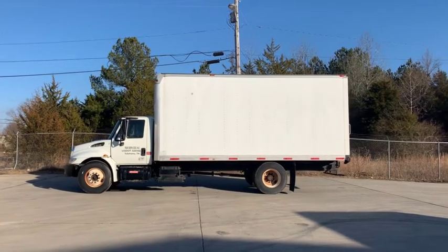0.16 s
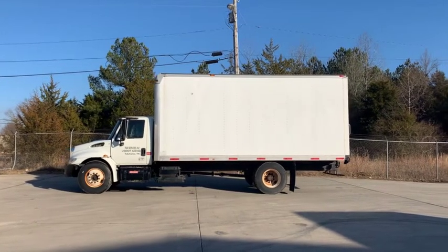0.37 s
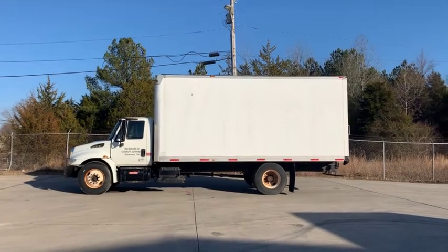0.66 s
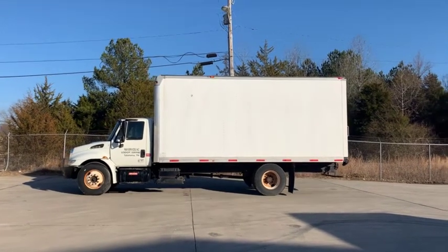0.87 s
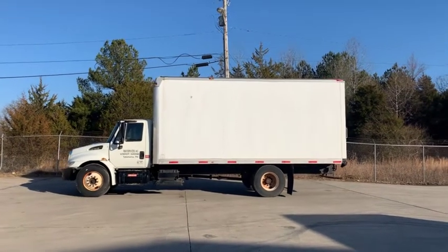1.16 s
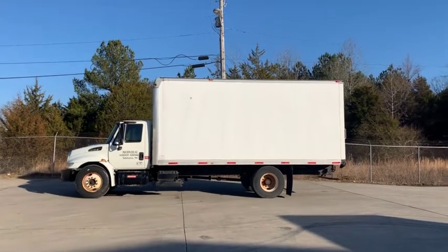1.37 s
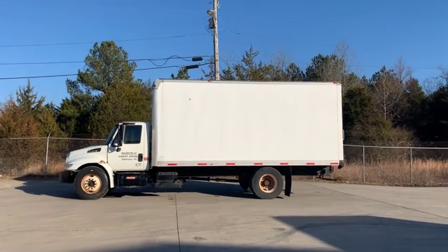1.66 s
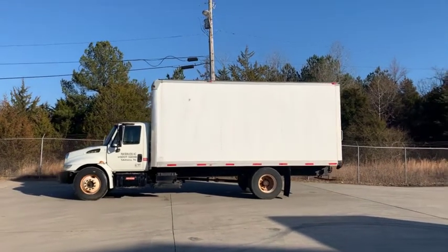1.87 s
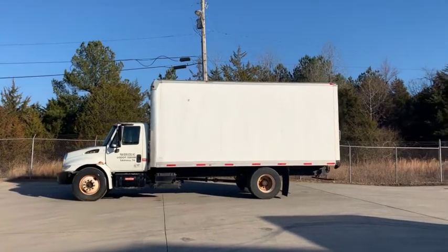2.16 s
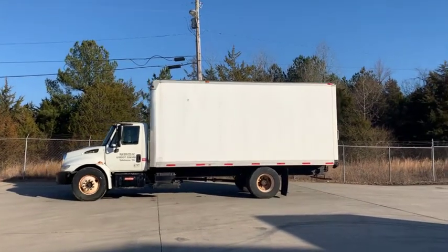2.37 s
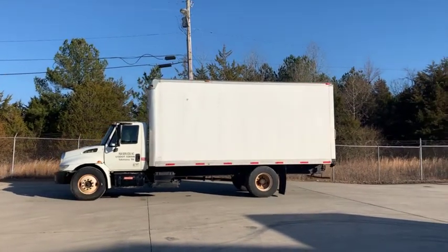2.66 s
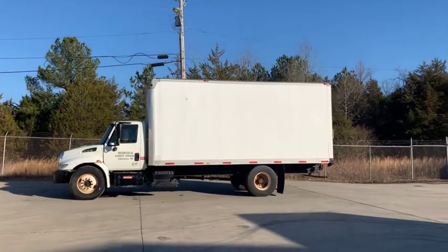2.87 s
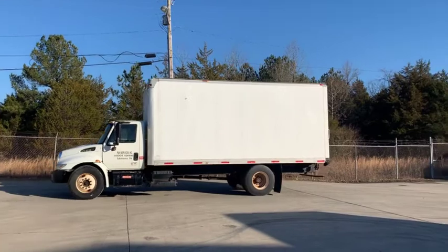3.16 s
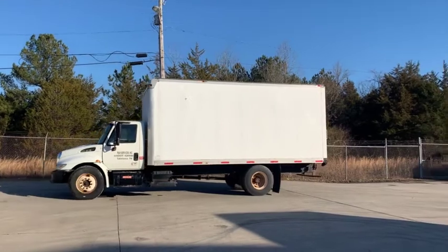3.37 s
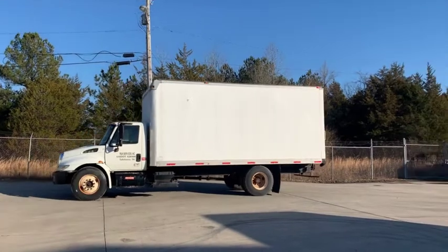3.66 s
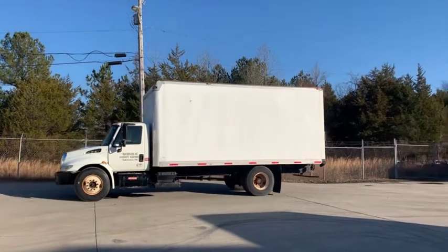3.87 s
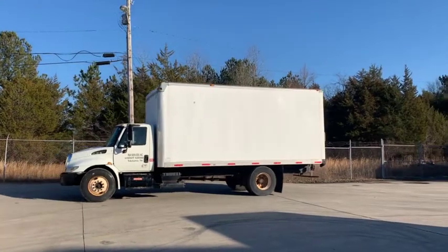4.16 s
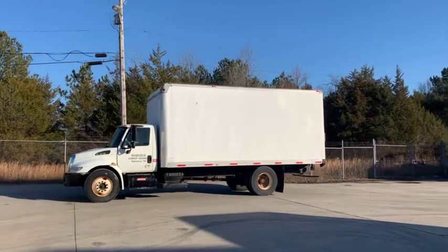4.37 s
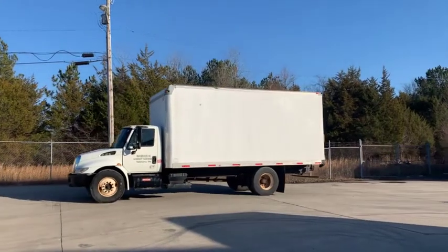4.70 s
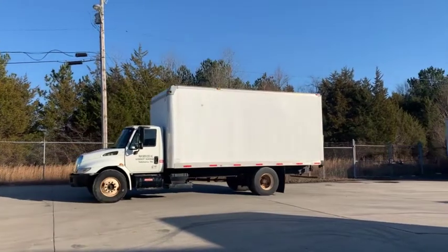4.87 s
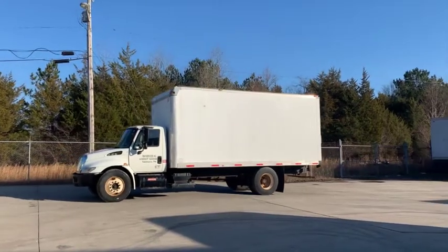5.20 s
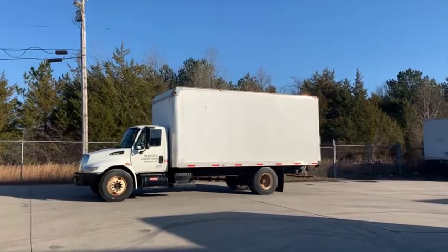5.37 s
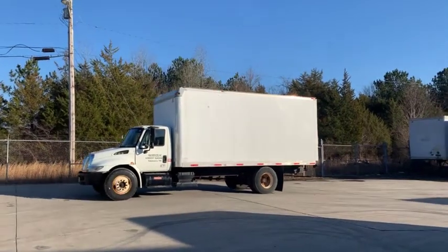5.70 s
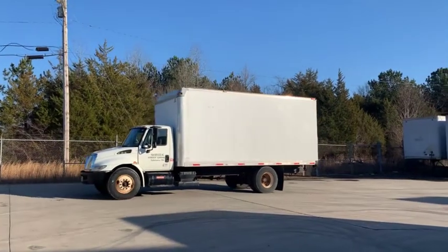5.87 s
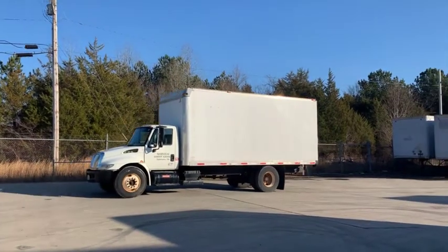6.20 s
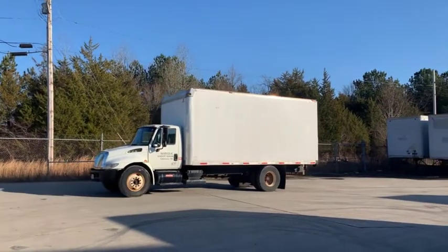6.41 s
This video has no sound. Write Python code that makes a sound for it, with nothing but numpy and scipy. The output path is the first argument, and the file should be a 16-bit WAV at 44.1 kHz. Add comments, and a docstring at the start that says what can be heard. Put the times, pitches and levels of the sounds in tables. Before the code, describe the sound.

A diesel box truck growls past in low gear across a concrete lot, drops suddenly to a quiet idle, then knocks with a hollow thud.

```python
"""Diesel box truck crossing a lot

A six-cylinder diesel box truck creeps across a concrete lot in low gear, passes, and drops back to idle. The
exhaust and the belt-driven fan sing in wavering tones; noise bursts at each firing shake the block. Injectors
tick as small struck modes, two faint steady hums sound throughout, and rubbing metal chirps. Near the end
something knocks in the chassis, and the box body answers with a ringing thud."""
import sys
import numpy as np
from scipy import signal
from scipy.fft import rfft, irfft, next_fast_len
from scipy.io import wavfile

SR = 44100
rng = np.random.default_rng(int(sys.argv[2]) if len(sys.argv) > 2 else 0)


def to_wav(s):
    """Save 16-bit WAV."""
    ch = np.atleast_2d(s).T  # columns
    pcm = np.round(np.clip(ch, -1, 1) * 32767)  # PCM
    wavfile.write(sys.argv[1], SR, pcm.astype(np.int16))


N = 288414
TIME = np.arange(N) / SR
SIZE = next_fast_len(N)
BIN_HZ = np.maximum(np.arange(SIZE // 2 + 1) * SR / SIZE, 1)

# exhaust: muffler and tailpipe resonances, levels relative to the overtones
BOOM_HZ, BOOM_WIDTH_HZ, BOOM_DB = 139.8, 20.7, 1
PIPE_HZ, PIPE_WIDTH_HZ, PIPE_DB = 372, 37, -10
# the boom throbs up and down by this much
THROBS_PER_FIRING, THROB_CREST_S, THROB_DB = .155, 1.155, 3

# fan: its octave blooms as it climbs into the shroud resonance
BLADES_PER_FIRING = 3.195
SHROUD_HZ, SHROUD_WIDTH_HZ, SHROUD_DB = 332, 22, 3
LINE_SLIP = .03   # phase unsteadiness of the boom and the fan tones, in cycles

# engine: speeds in firings per second, then the seconds it takes to cover its own distance from the listener
IDLE_HZ, CRUISE_HZ, PASS_S = 35, 50, 2.6
SWELL_IN_RUMBLE = 0.18   # share of each growl swell that reaches the rumble
LOPE_DB = 0.45   # clatter, crack and rasp pulse irregularly together
CRACK_DECAY = .42   # in firings
PUMP_DB, PUMP_CREST = 0.33, 0.69   # swing of the fuel stroke; its crest in firings into each pair

# injectors
TICK_HZ, TICK_SCATTER_HZ, TICK_SCATTER_DB = 4610, 130, 6
TICK_ALTERNATION_DB = 1   # one tick is harder by this much, the next softer

SQUEAK_SLIP = 0.25   # phase unsteadiness, in cycles
CUTOFF_HZ = 15100


def from_db(db):
    """Decibels to gain."""
    return 10 ** (np.asarray(db) / 20)


def rms_one(x):
    """Scale to rms 1 in the middle of the stereo image."""
    middle = np.atleast_2d(x).mean(0)
    return x / np.sqrt(np.mean(middle ** 2) + 1e-20)


def in_time(rows):
    """The columns of a curve at every sample."""
    s, *columns = np.transpose(rows)
    return [np.interp(TIME, s, c) for c in columns]


def at_hz(points, hz):
    """Read a table along log frequency."""
    known_hz, values = np.transpose(points)
    return np.interp(np.log(hz), np.log(known_hz), values)


def bumps(rows):
    """Smooth passing lifts or dips, in dB at every sample."""
    return sum(db * np.exp(-((TIME - s) / length) ** 2) for s, length, db in rows)


def drift(rate):
    """Smooth chance with about `rate` turns a second, spread 1."""
    slow = signal.resample_poly(rng.standard_normal(int(7 * rate) + 8), 16, 1)
    return rms_one(np.interp(TIME * rate * 16, np.arange(len(slow)), slow))


def tone(turns, waver_db, waver_rate, slip):
    """One partial whose strength and phase waver as the sound paths shift."""
    strength = from_db(waver_db * drift(waver_rate))
    phase = turns + rng.random() + slip * drift(waver_rate)
    return np.sqrt(2) * strength * np.sin(2 * np.pi * phase)


def resonance(hz, centre_hz, width_hz):
    """Gain of a tone that moves through a resonance; 1 on top."""
    return 1 / np.hypot(1, 2 * (hz - centre_hz) / width_hz)


def lifts(hz):
    """Response of the narrow resonances in cab, hood and block."""
    # Each row: centre in Hz, width in Hz, lift in dB
    body_resonances = [(366, 11, 5.5), (445, 19, 4), (631.4, 22, 8), (779, 16, 7), (837, 15, 4.5),
                       (878, 11, 3.5), (1110, 32, 5.5), (1265, 16, 7), (1496, 8.8, 9), (1790, 4.9, 6),
                       (2210, 32, 4), (2400, 34, 6.5), (6630, 47, 4)]
    peaks = [1 + (from_db(db) - 1) / (1 + 2j * (hz - centre) / width) for centre, width, db in body_resonances]
    return np.prod(peaks, axis=0)


def radiate(pair, spectrum):
    """Two unrelated excitations take on the truck's colour and reach left and right partly alike; rms 1."""
    # How alike left and right are. Each row: frequency in Hz, likeness from 0 to 1
    likeness = [(60, .996), (130, 0.96), (300, 0.97), (600, 0.78), (1300, 0.81), (2000, 0.075),
                (2800, 0.65), (4600, 0.43), (5500, 0.73), (7000, 0.16), (12000, 0.74)]
    # Stereo balance. Each row: frequency in Hz, left minus right in dB
    balance = [(60, -.5), (300, -0.3), (650, 2.5), (1300, 2), (2500, -1), (5000, -2), (9000, 0)]
    # Head start of the left side. Each row: frequency in Hz, phase lead in radians
    left_lead = [(20, 0), (200, .25), (500, .7), (1500, 1.2), (2500, 2.0), (3500, 3.1), (4500, 5.5),
                 (6000, 6.4), (7000, 6.6), (9000, 6.3)]
    direct, scattered = rfft(pair, SIZE) * from_db(at_hz(spectrum, BIN_HZ)) * lifts(BIN_HZ)
    alike = np.clip(at_hz(likeness, BIN_HZ), 0, 1)
    sides = np.array([[1], [-1]])
    both = np.sqrt(1 + alike) * direct + np.sqrt(1 - alike) * scattered * sides
    both = both * from_db(sides * at_hz(balance, BIN_HZ) / 2)
    both[1] *= np.exp(-1j * at_hz(left_lead, BIN_HZ))
    return rms_one(irfft(both, SIZE)[:, :N])


def firings(crank, spectrum, repeat, decay, depth, uneven_db):
    """Each firing adds a dying noise burst; the share `repeat` returns alike in every six-cylinder cycle."""
    # The cylinders knock unevenly: one level in dB each, in firing order
    cylinder_db = [0.26, 0, 2.1, 1.3, 0.5, 1.6]
    number, age = crank.astype(int), crank % 1   # age and decay in firings
    chance_db = uneven_db * np.sqrt(3) * rng.uniform(-1, 1, number[-1] + 1)
    blow_db = np.array(cylinder_db)[number % 6] + chance_db[number]
    depth, repeat = np.clip(depth, 0, 1), np.clip(repeat, 0, 1)
    pulse = rms_one((1 - np.exp(-age / 0.12)) * np.exp(-age / decay))
    burst = 1 - depth + depth * from_db(blow_db) * pulse
    # one stored cycle of noise, read at the speed of the crank
    size = 6 * SR // 50
    cycle = rng.standard_normal((2, size))[:, (crank / 6 * size).astype(int) % size]
    fresh = rng.standard_normal((2, N))
    return radiate(burst * (np.sqrt(repeat) * cycle + np.sqrt(1 - repeat) * fresh), spectrum)


def struck(events, modes, spread_db, contact_s):
    """Every blow (s, dB, pitch factor) sets each mode ringing with a strength of its own."""
    pitch, level_db, t60 = np.transpose(modes)[:, :, None]
    age, out = TIME[:int(t60.max() * SR)], np.zeros(N)
    fade = from_db(level_db - 60 * age / t60) * (1 - np.exp(-age / contact_s))
    signs = (-1) ** np.arange(len(pitch))[:, None]
    for s, db, factor in events:
        strengths = from_db(db + spread_db * rng.standard_normal(pitch.shape)) * signs
        ringing = strengths * fade * np.sin(2 * np.pi * factor * pitch * age)
        start = int(s * SR)
        out[start:start + len(age)] += ringing.sum(0)[:N - start]
    return out


def blows(events, spectrum, decay_s, tail_db, tail_s):
    """Dying noise stands for a crowd of close modes; the lot returns a weaker, longer tail."""
    level = np.zeros(N)
    for s, db in events:
        age = TIME[:N - int(s * SR)]
        rise = 1 - np.exp(-age / 0.00023)
        fall = np.exp(-age / decay_s) + from_db(tail_db) * np.exp(-age / tail_s)
        level[N - len(age):] += from_db(db) * rise * fall
    return level * radiate(rng.standard_normal((2, N)), spectrum)


def part_levels(firing_hz):
    """Each part follows load and speed in its own measure and changes as the truck rolls by; dB per sample."""
    # Engine load: pulls, eases, drops while coasting, then climbs again at idle.
    # Each row: time in seconds, dB relative to the starting load
    load = [(0, 0), (.3, 1.5), (1.05, -1), (1.8, 0), (2.25, 1.5), (3.85, -1.5), (4.25, -6), (4.76, -5.5),
            (4.86, -26), (5.05, -28), (5.18, -16), (5.25, -28), (5.3, -18), (5.41, -16), (5.5, -3),
            (5.6, -10), (6.54, 4.5)]
    # Mix of the truck. Each entry: base level in dB, share of the load's swing, dB per octave of speed,
    # moment it faces the listener in seconds, how narrowly it radiates (negative: weakest when facing)
    parts = { "throb": (-30, 0, 9, 1.9, 2), "blades": (-31, 0, 23, 0, 0.86),
             "rumble": (-28, 0.16, 9.5, 5, .5), "growl": (-28.5, 0, 11, 4, 0.24),
             "clatter": (-30.5, 0.18, 7, 3, 1.0), "crack": (-34.5, 1.2, 2, 1.94, 2.5),
             "rasp": (-33.5, 0.25, 5, 2.5, 2.5), "hiss": (-43.5, 0.15, 7.5, 3.5, .5),
             "sizzle": (-56, 0.2, 9, -2, -0.12), "injectors": (-41, 0.2, 18, 2.5, 4), }
    (load_db,) = in_time(load)
    octaves = np.log2(firing_hz / CRUISE_HZ)
    levels = {}
    for name, (db, share, speed_db, facing, narrow) in parts.items():
        away_db = narrow * 10 * np.log10(1 + ((TIME - facing) / PASS_S) ** 2)
        levels[name] = db + share * load_db + speed_db * octaves - away_db
    return levels


def exhaust(crank, firing_hz, level):
    """A firing tone from the tailpipe; overtones bloom as they meet pipe resonances, and the third throbs."""
    # Firing tone. Each row: time in seconds, level in dB
    drone_curve = [(0.0, -30), (0.03, -33.5), (0.31, -25), (0.58, -26.5), (1.71, -26.5), (2.28, -22),
                   (3.35, -24.5), (3.79, -23.5), (4.79, -33.5), (4.9, -45), (4.99, -39), (5.26, -48),
                   (6.12, -59), (6.45, -46), (6.49, -57), (6.54, -40)]
    # Plain overtones. Each row: multiple of the firing rate, relative level in dB
    orders = [(2, -6.5), (4, -17.5), (7, -18.5)]
    # Louder booms. Each row: centre in seconds, half-length in seconds, lift in dB
    boom_lifts = [(.3, 0.05, 6.5), (1.19, 0.092, 3.5), (2.12, 0.14, 3.5), (2.87, 0.023, 9),
                  (3.44, 0.097, 6.5)]
    (drone_db,) = in_time(drone_curve)
    drone = from_db(drone_db) * tone(crank, waver_db=0.5, waver_rate=12, slip=0.0084)
    overtones = sum(from_db(db) * tone(round(k) * crank, waver_db=2.5, waver_rate=9, slip=0.05)
                    for k, db in orders)
    crest = np.interp(THROB_CREST_S, TIME, crank)
    throb = np.cos(2 * np.pi * THROBS_PER_FIRING * (crank - crest))
    boom = from_db(BOOM_DB + THROB_DB * throb + bumps(boom_lifts))
    boom = boom * resonance(3 * firing_hz, BOOM_HZ, BOOM_WIDTH_HZ)
    overtones += boom * tone(3 * crank, waver_db=1, waver_rate=4, slip=LINE_SLIP)
    for k in range(7, 9):   # multiples that pass through the tailpipe resonance
        pipe = from_db(PIPE_DB) * resonance(k * firing_hz, PIPE_HZ, PIPE_WIDTH_HZ)
        overtones += pipe * tone(k * crank, waver_db=2.5, waver_rate=8.7, slip=0.039)
    return (drone + from_db(level["throb"]) * overtones) * from_db([[-.25], [.25]])   # a touch to the right


def fan(crank, firing_hz, level):
    """The blade tone and its octave follow the crank through the belt and flutter in the turbulent air."""
    turns, octave_hz = BLADES_PER_FIRING * crank, 2 * BLADES_PER_FIRING * firing_hz
    blade_gain = from_db(level["blades"])
    bloom = from_db(level["blades"] + SHROUD_DB) * resonance(octave_hz, SHROUD_HZ, SHROUD_WIDTH_HZ)
    flutter = from_db(2 * drift(45))
    blade = blade_gain * tone(turns, waver_db=-1.5, waver_rate=14, slip=LINE_SLIP)
    octave = bloom * tone(2 * turns, waver_db=0.9, waver_rate=11.0, slip=LINE_SLIP)
    return flutter * (blade + octave)


def body_and_intake(crank, level):
    """The firings shake the body into a rumble and make the intake growl, with brief swells."""
    # Growl swells and dips. Each row: centre in seconds, half-length in seconds, lift in dB
    growl_swells = [(.26, 0.068, 5.5), (3.507, 0.035, 5), (4.593, 0.098, 2.5), (5.6, .04, -2.5),
                    (6.203, 0.06, 4.5), (6.44, 0.063, 2.5)]
    # Body colour. Each row: frequency in Hz, relative dB per Hz
    rumble_colour = [(25, -30), (36, -48), (48, 2), (60, -8), (70, 2), (81, 1.5), (100, 1), (125, 3.5),
                     (150, -2), (190, -3.5), (260, -34), (400, -77)]
    # Intake colour. Each row: frequency in Hz, relative dB per Hz
    growl_colour = [(120, -14.5), (170, 1), (200, 1.5), (250, 2), (300, 0), (360, -5), (450, -14),
                    (600, -13), (900, -69)]
    swell_db = bumps(growl_swells)
    rumble = firings(crank, rumble_colour, repeat=0.46, decay=0.83, depth=0.43, uneven_db=0.5)
    growl = firings(crank, growl_colour, repeat=0.24, decay=1.0, depth=0.2, uneven_db=0.0)
    rumble_gain = from_db(level["rumble"] + SWELL_IN_RUMBLE * swell_db)
    return rumble_gain * rumble + from_db(level["growl"] + swell_db) * growl


def block_knock(crank, apart, level):
    """Combustion knock drives the block's clatter and hard crack and a rasp above them."""
    # The knock hardens for a few firings. Each row: centre in seconds, half-length in seconds, lift in dB
    hard_knocks = [(.65, 0.018, 1.5), (1.55, 0.012, 2), (1.802, 0.018, 1), (1.95, 0.021, 1),
                   (2.11, 0.015, 2), (2.48, .03, 1)]
    # It fades while coasting without fuel, then returns with a chuff.
    # Each row: centre in seconds, half-length in seconds, lift in dB
    coasting = [(4.9, 0.14, -1.5), (5.17, 0.063, -5), (5.315, 0.032, 3)]
    # Clatter colour. Each row: frequency in Hz, relative dB per Hz
    clatter_colour = [(250, -54), (400, -2), (490, -1), (550, -7), (700, -0.5), (850, -0.5), (1000, -1),
                      (1270, -5.5), (1500, -6.5), (1900, -13), (2800, -54)]
    # Crack colour. Each row: frequency in Hz, relative dB per Hz
    crack_colour = [(350, -35), (600, -0.5), (900, -0.5), (1400, 1), (1900, -7), (2500, -11.5), (3300, -23),
                    (5000, -60)]
    # Rasp colour. Each row: frequency in Hz, relative dB per Hz
    rasp_colour = [(700, -29), (1150, 1.5), (1450, 0.5), (1750, 1.5), (2050, -3), (2400, -3.5), (2800, -5),
                   (3400, -14), (5000, -61)]
    knock_db = bumps(hard_knocks) + bumps(coasting) + LOPE_DB * drift(20)
    clatter = firings(crank, clatter_colour, repeat=0.59, decay=0.53, depth=0.29 * apart, uneven_db=2.5)
    crack = firings(crank, crack_colour, repeat=0.7, decay=CRACK_DECAY, depth=0.72, uneven_db=0.8)
    rasp = firings(crank, rasp_colour, repeat=0.64, decay=0.99, depth=0.33 * apart, uneven_db=4.0)
    return (from_db(level["clatter"] + knock_db) * clatter + from_db(level["crack"] + knock_db) * crack
            + from_db(level["rasp"] + knock_db) * rasp)


def fuel_hiss(crank, apart, level):
    """The fuel system hisses, pulsing on every second firing, under a thin sizzle."""
    # Hiss colour. Each row: frequency in Hz, relative dB per Hz
    hiss_colour = [(2200, -1.5), (3000, 1), (3450, 2), (3900, 5), (4500, 6), (5200, 1), (6000, -1),
                   (6900, 0), (7800, -15.5), (9000, -47)]
    # Sizzle colour. Each row: frequency in Hz, relative dB per Hz
    sizzle_colour = [(6500, -18), (7800, -6), (8700, -2), (9600, 7.5), (10300, 0.5), (11000, -6.5),
                     (12500, -2.5), (15000, -13)]
    pump_db = PUMP_DB * np.cos(np.pi * (crank - PUMP_CREST))
    hiss = firings(crank, hiss_colour, repeat=0.36, decay=0.67, depth=0.21 * apart, uneven_db=6.0)
    sizzle = firings(crank, sizzle_colour, repeat=0.12, decay=0.75, depth=0.29 * apart, uneven_db=5.5)
    return from_db(level["hiss"] + pump_db) * hiss + from_db(level["sizzle"]) * sizzle


def engine(crank, firing_hz, level):
    """The same firings drive body, intake, block and fuel system."""
    apart = (IDLE_HZ / firing_hz) ** 0.37   # at idle the knocks stand apart; faster, they run together
    return body_and_intake(crank, level) + block_knock(crank, apart, level) + fuel_hiss(crank, apart, level)


def injectors(crank, level):
    """Thin steel ticks ring the injector lines on every firing, hard and soft in turn; some stand out."""
    # Ticks that stand out. Each row: start in seconds, level in dB, pitch in Hz
    loud_ticks = [(.3626, -34, 4510), (.792, -33, 4540), (1.7295, -34, 4370), (1.8123, -36, 4420),
                  (2.168, -36, 4310), (2.461, -29.5, 4610), (2.587, -33, 4565), (2.8095, -38, 4530),
                  (2.9547, -41, 4650), (3.031, -33, 4580), (3.116, -34, 4690), (3.2809, -35, 4670),
                  (3.37, -39, 4650), (3.4253, -36, 4800), (3.5676, -38, 4630), (3.6514, -33, 4650),
                  (3.689, -32, 4540)]
    # Ringing of the injector lines. Each row: multiple of the tick's pitch, level in dB, t60 in seconds
    line_modes = [(.95, -4, 0.015), (.98, -10.5, 0.027), (1.001, -4, 0.09), (1.025, -14, 0.042),
                  (1.49, -8.5, 0.057), (1.53, -17, 0.073)]
    at = np.flatnonzero(np.diff(np.floor(crank - .3)) > 0)   # .3 of a firing after each one starts
    strength, detune = rng.uniform(-0.97, 1, (len(at), 2)).T
    turn_db = TICK_ALTERNATION_DB * (-1) ** crank[at].astype(int)
    tick_db = level["injectors"][at] + turn_db + TICK_SCATTER_DB * strength
    chatter = np.column_stack([TIME[at], tick_db, TICK_HZ + TICK_SCATTER_HZ * detune])
    # left and right share the ticks but draw their own mode strengths
    return np.array([struck(chatter, line_modes, spread_db=4.5, contact_s=0.0011)
                     + struck(loud_ticks, line_modes, spread_db=0.5, contact_s=0.0012) for side in range(2)])


def steady_hums():
    """Two faint wavering steady tones; the lower swells just before the engine runs down and during it."""
    # Each row: frequency in Hz, level in dB
    hum_tones = [(102, -43), (329, -46.5)]
    # Swells of the lower tone. Each row: centre in seconds, half-length in seconds, lift in dB
    low_swells = [(4.6, .13, 10), (4.974, 0.13, 11)]
    tone_lifts = (bumps(low_swells), 0)
    return sum(from_db(db + lift_db) * tone(hz * TIME, waver_db=4.0, waver_rate=6, slip=0.12)
               for (hz, db), lift_db in zip(hum_tones, tone_lifts))


def squeaks():
    """Faint chirps of rubbing metal: sines with unsteady phase under smooth swells."""
    # Each row: centre in seconds, half-length in seconds, pitch in Hz, peak level in dB
    chirps = [(0.24, .012, 5600, -43), (4.412, 0.045, 6330, -45)]
    total = np.zeros(N)
    for s, length, hz, db in chirps:
        swell = np.exp(-((TIME - s) / length) ** 2)
        total += from_db(db) * swell * np.sin(2 * np.pi * (hz * TIME + SQUEAK_SLIP * drift(280)))
    return total


def chassis():
    """A hard knock rings in the steel frame and shakes the box, which thuds as it settles."""
    # The knock and its rebound. Each row: start in seconds, level in dB
    knock_blows = [(6.281, -21), (6.309, -35)]
    # Thuds of the box. Each row: start in seconds, level in dB
    box_thuds = [(6.288, -12), (6.308, -9.5), (6.335, -16.5), (6.389, -24)]
    # Knock colour. Each row: frequency in Hz, relative dB per Hz
    knock_colour = [(200, 6), (400, 3), (650, 2.5), (950, -3), (1450, 1), (1900, -4), (2220, -5),
                    (2800, -20), (3400, -6), (4100, -10.5), (4700, -16), (6500, -20.5), (9000, -34),
                    (15000, -30)]
    # Steel frame. Each row: mode in Hz, level in dB, t60 in seconds
    frame_modes = [(385, 0, 0.078), (560, -9, .08), (700, -2, .07), (880, -5, .08), (1410, 0, 0.044),
                   (1690, 1, 0.038), (2200, -5, 0.063), (3400, -12, 0.065), (4220, -11, .06)]
    # Box body. Each row: mode in Hz, level in dB, t60 in seconds
    box_modes = [(112, -7, 0.095), (162, -0.5, 0.05), (221, -8, 0.035), (309, -8, 0.075)]
    knock = blows(knock_blows, knock_colour, decay_s=0.013, tail_db=-10.5, tail_s=0.048)
    clank = struck([(s, db, 1) for s, db in knock_blows], frame_modes, spread_db=0.0, contact_s=0.0024)
    thud = struck([(s, db, 1) for s, db in box_thuds], box_modes, spread_db=1.5, contact_s=0.0022)
    return knock + clank + thud


def scene():
    """Everything on the engine turns with one crank, counted in firings."""
    # Engine speed: three nudges of the pedal, then down to idle.
    # Each row: time in seconds, firings per second
    speed = [(0, 42.3), (.37, 46.9), (.6, 46.6), (.9, 47.5), (1.85, 46.7), (2.2, 50.0), (2.6, 49.2),
             (3.5, 48.7), (3.95, 52.1), (4.2, 52.0), (4.45, 52.5), (4.76, 52.0), (4.83, 51.1), (5.1, 37.6),
             (5.25, 35.6), (6.54, 34.8)]
    (firing_hz,) = in_time(speed)
    crank = np.cumsum(firing_hz) / SR
    level = part_levels(firing_hz)
    motor = exhaust(crank, firing_hz, level) + fan(crank, firing_hz, level)
    motor = motor + engine(crank, firing_hz, level) + injectors(crank, level)
    return motor + steady_hums() + squeaks() + chassis()


def record(dry):
    """A steep elliptic low-pass cuts the top."""
    return signal.sosfilt(signal.ellip(10, .1, 80, CUTOFF_HZ, fs=SR, output="sos"), dry)


dry = scene()
out = record(dry)
to_wav(out)
```